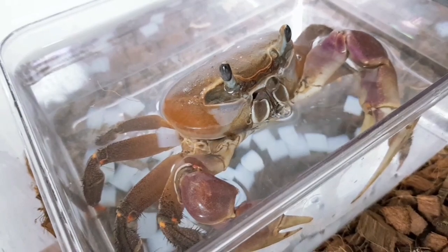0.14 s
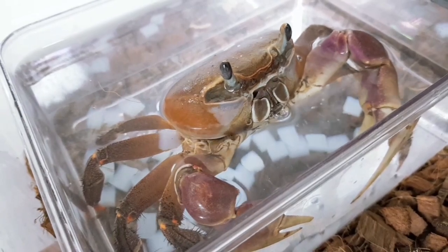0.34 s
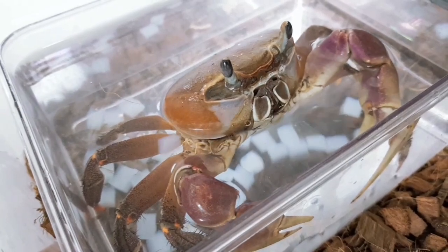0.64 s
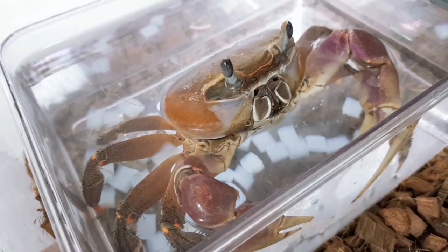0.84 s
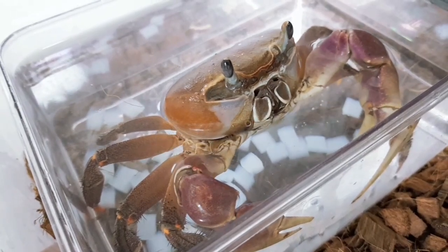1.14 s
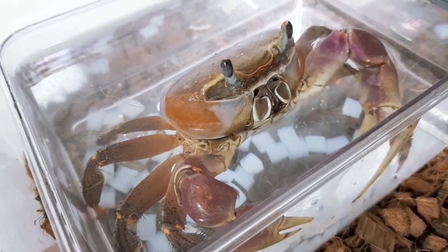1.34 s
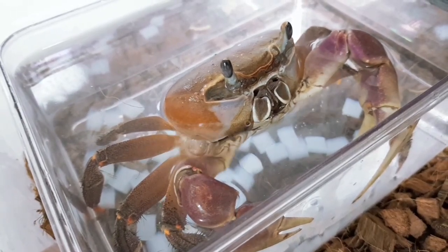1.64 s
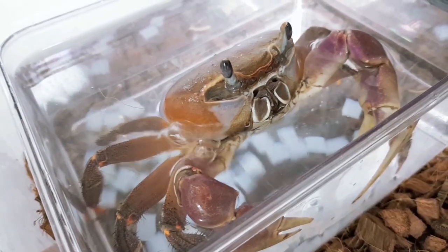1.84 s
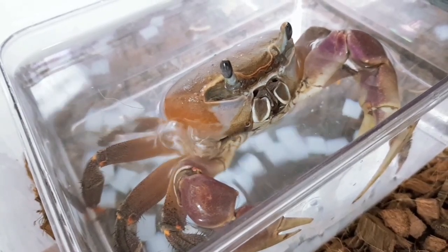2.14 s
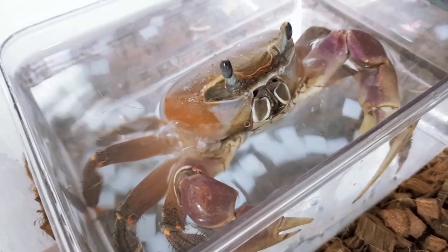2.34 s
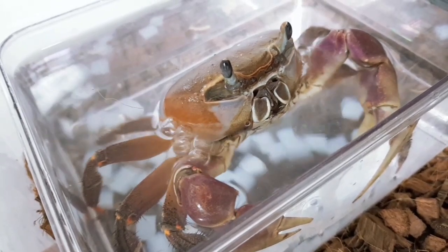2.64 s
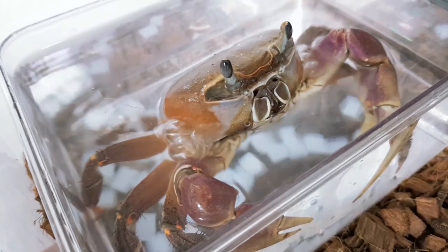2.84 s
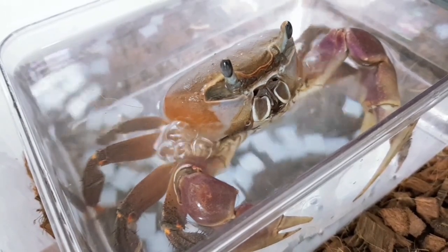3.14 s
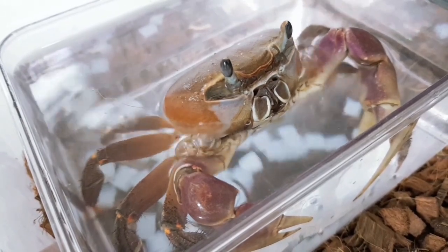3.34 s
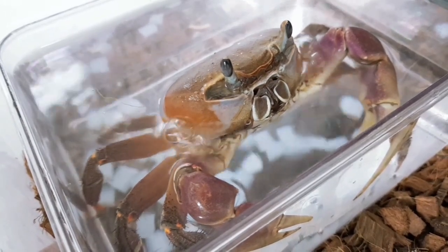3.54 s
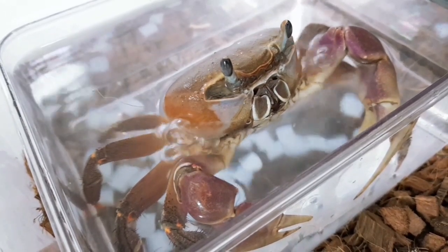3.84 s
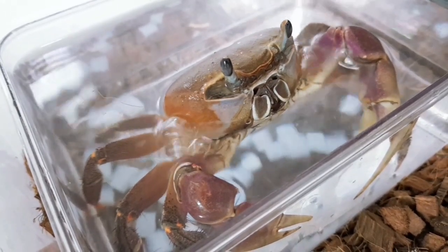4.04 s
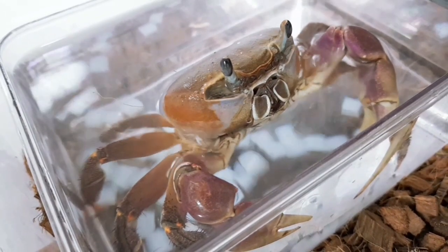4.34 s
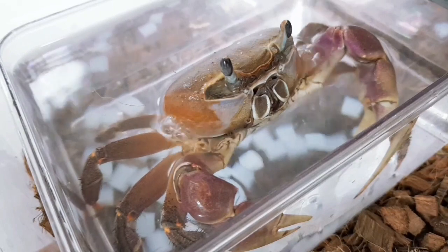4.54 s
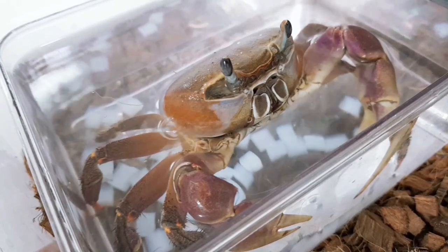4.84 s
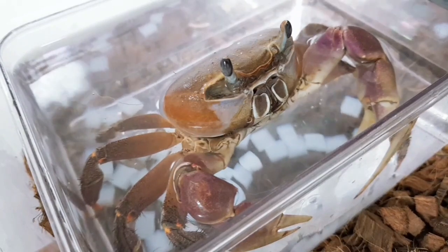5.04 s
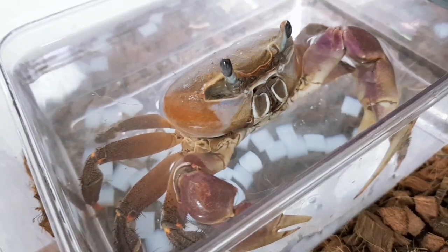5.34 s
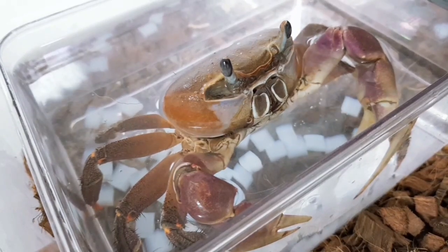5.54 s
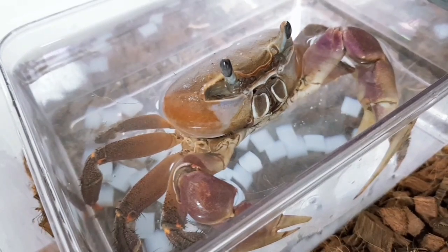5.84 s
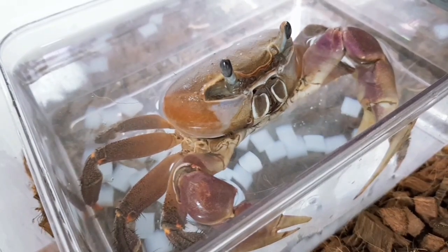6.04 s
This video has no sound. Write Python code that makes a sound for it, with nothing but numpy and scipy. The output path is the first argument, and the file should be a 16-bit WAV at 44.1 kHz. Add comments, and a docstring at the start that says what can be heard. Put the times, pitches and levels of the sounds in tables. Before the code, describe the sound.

Fine bubbles snap, tick and ping at a crab's mouth, building to a busy crackle then fading, above a constant low electrical hum.

```python
"""Crab frothing in a plastic tub

A small crab froths at its mouth in a plastic tub, close to a mono microphone in a quiet room.
At its busiest a big bubble cracks about five times a second, often followed by a chirp; small ones ring between.
Each is a decaying tone, rising as the hole in its film widens; the tub echoes it at once and rings.
Tiny films snap in the treble as raggedly pitched pings with noise; faint foam crackles and gurgles.
Soft bumps sound the tub; beneath lie a humming motor, a fan of filtered noise and thin electrical whines."""
import sys
import numpy as np
from scipy import signal
from scipy.fft import rfft, irfft, next_fast_len
from scipy.io import wavfile
from scipy.ndimage import uniform_filter1d

SR = 44100
rng = np.random.default_rng(int(sys.argv[2]) if len(sys.argv) > 2 else 0)


def dump(signal):
    """Clip the signal to [-1, 1] and save it as 16-bit WAV at the path in sys.argv[1]."""
    limited = np.clip(np.atleast_2d(signal).T, -1, 1)
    pcm = np.round(limited * 32767).astype(np.int16)
    wavfile.write(sys.argv[1], SR, pcm)


N = 272979
TIME = np.arange(N) / SR  # s


def undb(db):
    """Decibels to gain."""
    return 10 ** (np.asarray(db) / 20)


def add(track, s, sound):
    """Mix a sound into the track at time s."""
    start = max(int(round(s * SR)), 0)
    part = sound[:max(N - start, 0)]
    track[start:start + len(part)] += part


def shape_db(points, size):
    """A spectrum's points joined on a log axis, for each bin of a transform."""
    hz, db = np.transpose(points)
    bins_hz = np.fft.rfftfreq(size, 1 / SR)
    return np.interp(np.log(bins_hz + 1), np.log(hz), db)


def colour(x, points, size=1024):
    """Minimum-phase filter with the given spectrum: it rings only after a click."""
    cepstrum = irfft(np.log(undb(shape_db(points, size))))
    # folding the cepstrum onto positive times makes the filter causal
    cepstrum[1:size // 2] *= 2
    cepstrum[size // 2 + 1:] = 0
    impulse = irfft(np.exp(rfft(cepstrum)))
    return signal.fftconvolve(x, impulse)[:len(x)]


def noise(points):
    """Steady noise of a given density in dB per Hz."""
    size = next_fast_len(N, True)
    spectrum = rfft(rng.standard_normal(size)) * undb(shape_db(points, size))
    return irfft(spectrum, size)[:N] * np.sqrt(SR / 2)


def walk(rate):
    """Slow chance: random levels held 1 / rate s and slewed twice, scaled to unit deviation."""
    hold = max(int(SR / rate), 1)
    steps = np.repeat(rng.standard_normal(N // hold + 1), hold)
    smooth = uniform_filter1d(uniform_filter1d(steps, hold), hold)[:N]
    return smooth / smooth.std()


def bubble(hz, decay_ms, rise, tear_ms=0.048, open_hz=7000, upper_ratio=1.6, upper_db=-6, rasp_db=-3, slow_ms=1.0):
    """The air in a bubble rings through the tear; the pitch climbs until the film is wide open."""
    ms = np.arange(SR // 40) / SR * 1000
    # rise is the share gained per decay time
    pitch = np.minimum(hz * (1 + rise * ms / decay_ms), open_hz)
    phase = 2 * np.pi * np.cumsum(pitch) / SR
    attack = 1 - np.exp(-ms / tear_ms)
    fade = np.exp(-ms / decay_ms)
    # a slow bubble also rasps and sounds a higher mode; both outlast the click but die sooner than the ring
    upper_mode = undb(upper_db) * np.sin(upper_ratio * phase)
    rasp = undb(rasp_db) * rng.standard_normal(len(ms))
    slowness = decay_ms ** 2 / (decay_ms ** 2 + slow_ms ** 2)
    return attack * fade * (np.sin(phase) + slowness * np.sqrt(fade) * (upper_mode + rasp))


def pops(cracks_db=-7.5, chirps_db=-5.5, rings_db=-4):
    """Big bubbles burst in one sharp swing, middling ones chirp; the smaller and weaker, the longer the ring."""
    out = np.zeros(N)

    # big bubbles: start_s, strength_db (relative), starting pitch_hz
    cracks = [(1.165, -18, 1900), (1.34, -17.5, 2600), (1.5143, -18, 2050), (1.696, -12, 2140),
              (1.8804, -12.5, 2180), (2.0612, -9.5, 2080), (2.246, -11.5, 2100), (2.371, -8, 1370),
              (2.4296, -10.5, 2020), (2.6137, -11, 2070), (2.7945, -10, 2100), (2.988, -11.5, 2110),
              (3.1063, -17, 1350), (3.1756, -12, 2100), (3.299, -13, 1340), (3.3628, -11, 2130),
              (3.5499, -9, 2030), (3.756, -11.5, 1900), (3.971, -12, 2240), (4.231, -17, 2490)]
    for s, db, hz in cracks:
        add(out, s, undb(db + cracks_db) * bubble(hz, decay_ms=0.13, rise=0.78))

    # middling bubbles, often just after a crack: start_s, strength_db (relative)
    chirps = [(1.8565, -29), (2.0266, -34), (2.1057, -31), (2.288, -26), (2.474, -24), (2.6586, -21),
              (2.8413, -23), (2.879, -34), (2.9026, -28), (3.0247, -29.5), (3.213, -29), (3.4011, -25),
              (3.578, -24.5), (3.6555, -40), (3.7618, -22), (4.1, -41), (4.3937, -32), (5.1893, -35)]
    for s, db in chirps:
        chirp = bubble(2400, decay_ms=0.4, rise=1.35, tear_ms=0.096, open_hz=6750)
        add(out, s, undb(db + chirps_db) * chirp)

    # small bubbles on a clear pitch: start_s, strength_db (relative), starting pitch_hz
    rings = [(0.105, -39, 4170), (0.1397, -45, 2740), (0.1954, -47, 3760), (0.5916, -50, 5280),
             (0.6638, -51.5, 6440), (.756, -42.5, 4030), (0.8887, -36, 4250), (.93, -39.5, 3900),
             (1.0052, -45.5, 4020), (1.0273, -49, 2810), (1.0783, -50, 4070), (1.1029, -48, 2840),
             (1.152, -42, 4030), (1.153, -41.5, 6490), (1.201, -44, 2850), (1.236, -35, 4140),
             (1.2633, -46, 3530), (1.329, -35, 4110), (1.3762, -42, 2820), (1.4137, -38.5, 4220),
             (1.4437, -39, 4050), (1.4552, -47, 2800), (1.5957, -38, 4360), (1.6324, -46, 2780),
             (1.6757, -43.5, 2720), (1.7325, -46, 2870), (1.795, -44, 2650), (1.9075, -44, 2740),
             (2.1864, -43, 4850), (2.2147, -41, 4450), (2.225, -40, 4870), (2.334, -45, 4560),
             (2.3398, -37.5, 4580), (2.347, -46, 4600), (2.4114, -42, 4300), (2.5302, -44, 2720),
             (2.5844, -36.5, 4100), (2.6314, -44, 5060), (2.7146, -43, 4580), (2.746, -40, 4430),
             (2.7764, -45, 4900), (2.7814, -43, 4520), (2.963, -40.5, 4550), (3.0088, -38, 4850),
             (3.037, -46, 4550), (3.1243, -49, 4600), (3.1671, -45, 4770), (3.1934, -37.5, 5170),
             (3.27, -34, 4650), (3.28, -39.5, 4450), (3.287, -41, 4960), (3.4204, -32, 4940),
             (3.4925, -46, 5270), (3.4977, -40, 3920), (3.5227, -44, 4460), (3.565, -42, 5050),
             (3.666, -39, 4930), (3.7006, -39.5, 4500), (3.7711, -39, 4820), (3.864, -47.5, 4840),
             (3.9006, -38.5, 4530), (3.911, -30.5, 5040), (3.9239, -34, 4300), (3.963, -49, 4180),
             (4.0236, -43, 4730), (4.076, -46.5, 4630), (4.1605, -33.5, 4580), (4.1796, -41.5, 5640),
             (4.306, -41.5, 4650), (4.322, -46, 4620), (4.3756, -45, 5200), (4.565, -49, 4670),
             (4.6614, -43.5, 4740), (4.7545, -48, 5000), (4.7663, -45.5, 4900), (4.846, -55, 4520)]
    base_ms, base_hz, base_db = 2.66, 4300, -38  # decay time of a bubble of this pitch and strength
    pitch_power, halving_db = 1.33, 18.5  # a bubble this much stronger rings half as long
    for s, db, hz in rings:
        decay_ms = base_ms * (hz / base_hz) ** pitch_power * 2 ** ((base_db - db) / halving_db)
        ring = bubble(hz, decay_ms, rise=0.039, tear_ms=0.17, upper_ratio=1.42, upper_db=-9.5, rasp_db=-2.5)
        add(out, s, undb(db + rings_db) * ring)
    return out


def snaps(gain_db=2.0, swell_ms=0.69, decay_ms=0.94, rise=0.048, fizz_db=-17, fizz_ms=7, ragged=0.093):
    """A tiny bubble pings very high and shatters; its spray crackles on for a moment."""
    # tiniest bubbles: start_s, strength_db (relative), middle pitch_hz, spray_db relative to the ring
    snap_list = [(.1393, -44, 11500, -19), (2.225, -47, 12400, 5), (2.37, -42.5, 11200, -1),
                 (2.4174, -26.5, 11940, -9), (2.748, -44.5, 10700, 8.5), (2.7979, -49, 12800, 9),
                 (2.8418, -33.5, 11650, -5), (2.926, -35, 10400, 3.5), (3.1094, -37.5, 13300, 2.5),
                 (3.1967, -41.5, 11200, -1), (3.2689, -33.5, 11100, -16), (3.281, -39, 11500, -6),
                 (3.2944, -29, 12100, -5), (3.3048, -30, 10600, -3), (3.3398, -54, 11200, 17.5),
                 (3.492, -45, 12700, 3.5), (3.5638, -42.5, 11300, 5), (3.67, -41.5, 12400, 3.5),
                 (3.847, -44, 12900, -2), (4.0397, -43, 12600, -17), (4.0563, -37, 12700, -13),
                 (4.283, -40.5, 12900, -1.5), (4.3084, -39.5, 14200, 0.5), (4.3327, -40.5, 12100, 8),
                 (4.6647, -42, 12600, -25)]
    # colour of a snap: frequency_hz, gain_db
    snap_colour = [(700, -33), (2000, -39), (4500, -8), (6500, 1), (9000, -16), (10500, -7), (12000, 1.5),
                   (14500, -15)]
    out = np.zeros(N)
    ms = np.arange(SR // 20) / SR * 1000
    fade = np.exp(-ms / decay_ms)
    burst = (1 - np.exp(-ms / swell_ms)) * fade
    for s, db, hz, spray_db in snap_list:
        # the pitch climbs from below to above its middle as the film opens
        pitch = hz * (1 + rise * (1 - 2 * fade))
        tear, droplets = rng.standard_normal((2, len(ms)))
        ring = burst * np.sin(2 * np.pi * np.cumsum(pitch * (1 + ragged * tear)) / SR)
        # squaring with the sign kept makes the noise spiky
        spiky = droplets * np.abs(droplets) / np.sqrt(3)
        spray = (burst + undb(fizz_db) * np.exp(-ms / fizz_ms)) * spiky
        add(out, s, undb(db + gain_db) * (ring + undb(spray_db) * spray))
    return colour(out, snap_colour)


def grains(draws, low_hz, high_hz, short_ms, long_ms, gain_db, scatter_db):
    """Random bubbles, one for each row of draws, their strength following how hard the crab froths."""
    # frothing: time_s, strength_db of the faint bubbles (relative)
    froth_curve = [(0, -84), (.8, -56), (1.6, -55), (2.3, -54.5), (3.3, -54.5), (4.2, -53.5), (4.8, -59),
                   (5.3, -79), (6.2, -81)]
    out = np.zeros(N)
    for when, size, length, spread in draws:
        s = when * N / SR
        db = np.interp(s, *np.transpose(froth_curve)) + gain_db + scatter_db * (2 * spread - 1)
        hz = low_hz + (high_hz - low_hz) * size
        decay_ms = short_ms + (long_ms - short_ms) * length
        add(out, s, undb(db) * bubble(hz, decay_ms, rise=0.04))
    return out


def froth(count=440):
    """Faint, short crackle of the foam between the loud pops."""
    draws = rng.random((count, 4))
    return grains(draws, low_hz=3460, high_hz=6320, short_ms=0.22, long_ms=0.61, gain_db=-2.0, scatter_db=0.5)


def gurgle(count=260):
    """Larger pockets of air gurgle softly in the crab's mouth, dulled by a low-pass filter."""
    draws = rng.random((count, 4))
    pockets = grains(draws, low_hz=667, high_hz=963, short_ms=3.0, long_ms=8.1, gain_db=-18, scatter_db=8)
    return signal.sosfilt(signal.butter(2, 1000, fs=SR, output="sos"), pockets)


def tub(x, variety_db=2.0, ring_ms=2.14):
    """Near walls repeat each pop at once and the air between crab and tub rings, varying over time."""
    # wall echoes: delay_ms, gain (linear)
    walls = [(.77, 0.12), (1.08, 0.12), (1.99, .1), (3.01, 0.052)]
    # ringing of the enclosed air: pitch_hz, peak_db relative to the sound before colouring
    air_modes = [(1890, 0.5), (2680, 2.5), (2980, -5), (3650, -1.5), (4030, 3.5), (4540, 2), (4990, 0),
                 (5280, -9), (6290, 5), (7400, 7.5), (8000, 12)]
    # colour of the tub and the microphone, whose response dips deeply near 9.5 kHz: frequency_hz, gain_db
    tub_colour = [(600, -11), (1200, -34.5), (1900, 0), (2400, -3.5), (3300, -3), (3900, -0.5), (5000, -4),
                  (5700, -1), (6400, 2.5), (7000, -7), (9500, -55.5), (11500, -10), (14500, -7.5)]
    out = x.copy()
    for ms, gain in walls:
        add(out, ms / 1000, gain * x)
    t = TIME[:SR // 40]
    fade = np.exp(-t * 1000 / ring_ms)
    for hz, db in air_modes:
        ring = 2 * np.cos(2 * np.pi * hz * t) * fade / fade.sum()
        out += undb(db + variety_db * walk(22)) * signal.oaconvolve(x, ring)[:N]
    return colour(out, tub_colour)


def room(x, near_db=-10.5, near_s=0.0033, far_db=-15, far_s=0.089, build_s=0.0067):
    """Scatter inside the tub dies fast; the room adds a faint, duller and longer tail."""
    # room tail, dull because the treble is soaked up: frequency_hz, gain_db
    room_colour = [(1000, 11), (5000, -2.5), (8000, -17), (12000, -8)]
    t = TIME[:SR // 3]
    tails = []
    for db, decay_s in ((near_db, near_s), (far_db, far_s)):
        tail = rng.standard_normal(len(t)) * np.exp(-t / decay_s) * (1 - np.exp(-t / build_s))
        tails.append(undb(db) * tail / np.linalg.norm(tail))
    scatter, far = tails
    return x + signal.fftconvolve(x, scatter + colour(far, room_colour))[:N]


def bumps(push_s=0.012):
    """A soft push makes the low modes of the tub sound briefly."""
    # soft bumps on the tub: start_s, strength_db (relative), pitch_hz, decay_s
    bump_list = [(0.227, -56, 384, 0.021), (0.351, -54, 363, 0.015), (1.332, -44, 359, 0.016)]
    # low modes of the tub: multiple of the bump's pitch (ratio), level_db (relative)
    tub_modes = [(1, 7.5), (1.12, 2), (1.3, -3)]
    out, t = np.zeros(N), TIME[:SR // 4]
    for s, db, hz, decay_s in bump_list:
        modes = sum(undb(mode_db) * np.sin(2 * np.pi * hz * ratio * t) for ratio, mode_db in tub_modes)
        envelope = (1 - np.exp(-t / push_s)) * np.exp(-t / decay_s)
        add(out, s, undb(db) * envelope * modes)
    return out


def motor(waver_db=0.4, drift=0.28):
    """A throbbing shaft tone, a nearly steady mains hum and narrow, restless casing tones."""
    # casing tones the motor shakes: pitch_hz, nominal width_hz, rms amplitude_db
    casing = [(151.3, 7, -57), (190, 5, -62.5), (239, 5, -60), (305.3, 6, -59.5), (351.8, 5, -59.5)]
    throb_hz, throb_db, throb_rate, throb_depth = 58.7, -58, 12, 0.57  # rate: random swells per second
    mains_hz, mains_db = 119.6, -52.5
    throb = undb(throb_db) * (1 + throb_depth * walk(throb_rate))
    # the root of two turns an rms level into a sine's peak; drift is in radians
    out = np.sqrt(2) * throb * np.sin(2 * np.pi * throb_hz * TIME + drift * walk(7))
    out += np.sqrt(2) * undb(mains_db + waver_db * walk(10)) * np.sin(2 * np.pi * mains_hz * TIME)
    for hz, width_hz, db in casing:
        phase = 2 * np.pi * hz * TIME
        # two independent slow walks widen the tone into a narrow band
        band = walk(2 * width_hz) * np.sin(phase) + walk(2 * width_hz) * np.cos(phase)
        out += undb(db) * band / np.sqrt(2)
    return out


def fan(flutter_db=1.24):
    """Low room rumble, a hollow, slightly fluttering hiss and thin air on top, all shaped noise."""
    # room rumble: frequency_hz, density_db per Hz
    rumble = [(20, -114), (40, -83.5), (80, -83), (110, -82.5), (160, -78), (215, -81.5), (280, -79),
              (360, -83.5), (410, -92.5), (500, -100), (700, -109), (1000, -114), (2000, -135)]
    # fan hiss: frequency_hz, density_db per Hz before the flutter
    hiss = [(800, -120), (1020, -111), (1240, -96.5), (1480, -100), (1870, -86), (2150, -91.5),
            (2600, -106), (3270, -121), (3950, -104), (5600, -108), (6500, -107), (7200, -113),
            (7800, -138)]
    # thin air: frequency_hz, density_db per Hz
    air = [(9600, -138), (10800, -112), (12400, -107), (14500, -112)]
    return noise(rumble) + undb(flutter_db * walk(9)) * noise(hiss) + noise(air)


def whines(waver=.8):
    """Thin tones of nearby electrics, their phase wandering slightly (waver in radians)."""
    # electrical whines: pitch_hz, rms level_db
    whine_list = [(2493, -84.5), (2690, -85.5), (5400, -98), (6412, -83.5), (11097, -92.5)]
    return sum(np.sqrt(2) * undb(db) * np.sin(2 * np.pi * hz * TIME + waver * walk(12)) for hz, db in whine_list)


def scene():
    """The crab over the room's hum, the same in both channels."""
    in_tub = tub(pops() + froth())
    crab = room(in_tub + snaps() + gurgle())
    mono = crab + bumps() + motor() + fan() + whines()
    return np.array([mono, mono])


def record(dry):
    """The recorder cuts the top steeply, above 14.8 kHz."""
    return signal.sosfilt(signal.ellip(10, .2, 70, 14800, fs=SR, output="sos"), dry)


dry = scene()
out = record(dry)
dump(out)
```